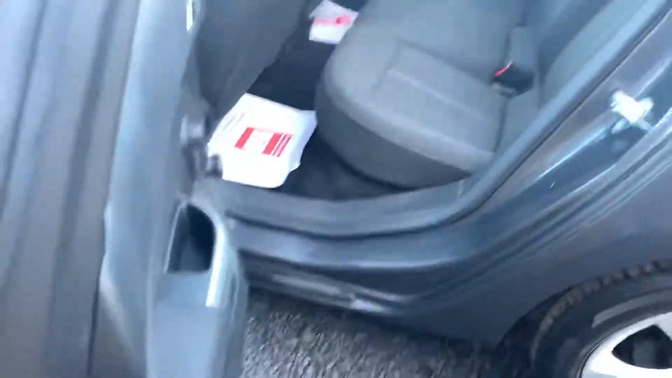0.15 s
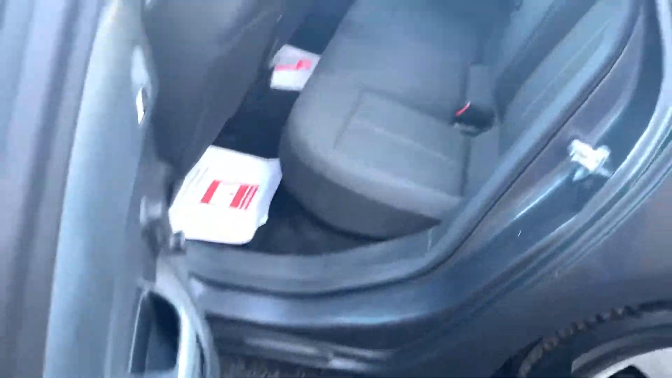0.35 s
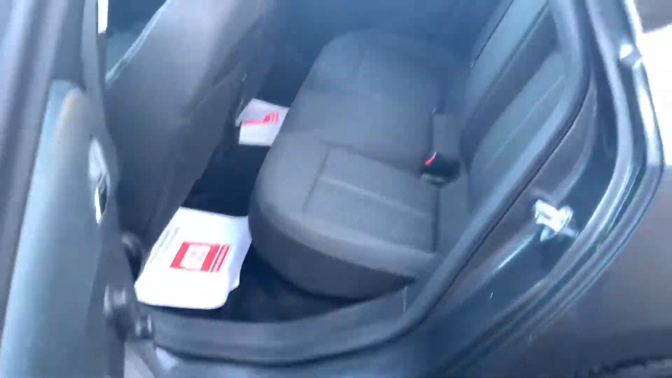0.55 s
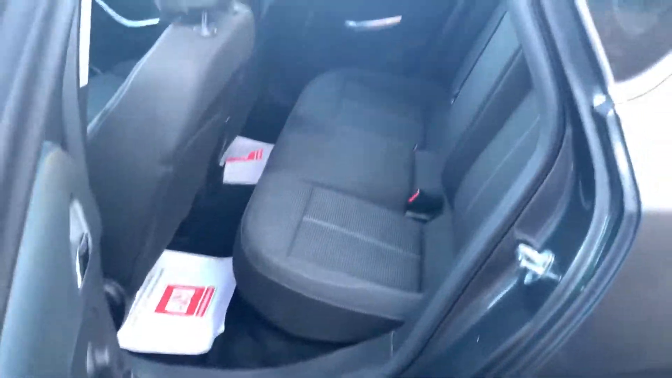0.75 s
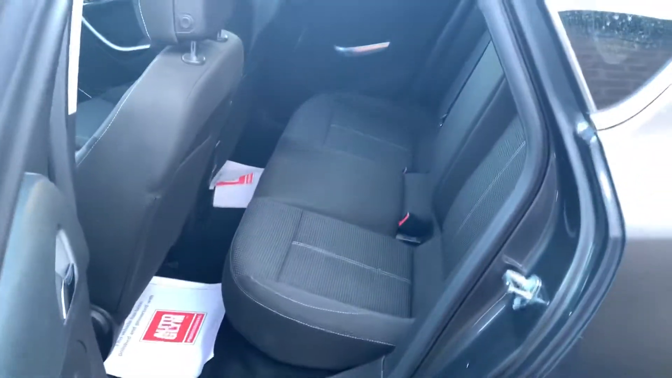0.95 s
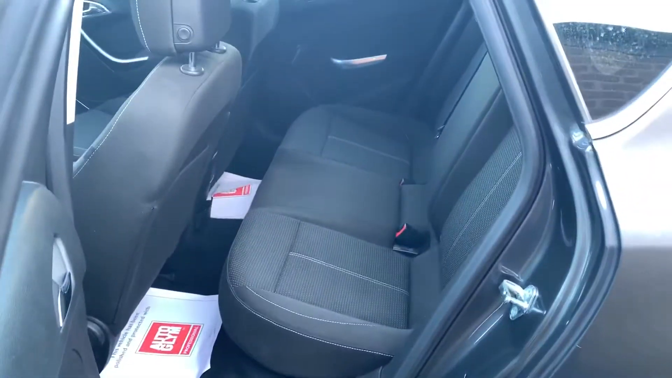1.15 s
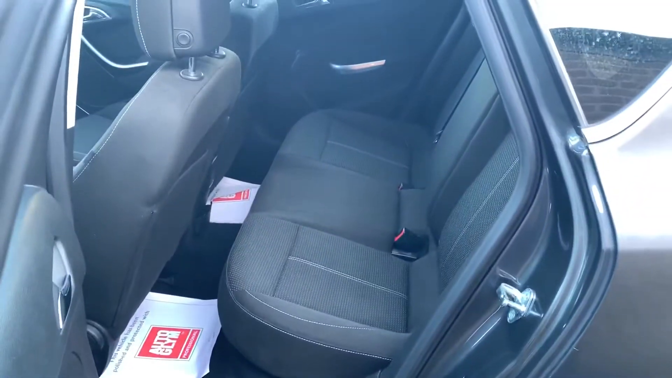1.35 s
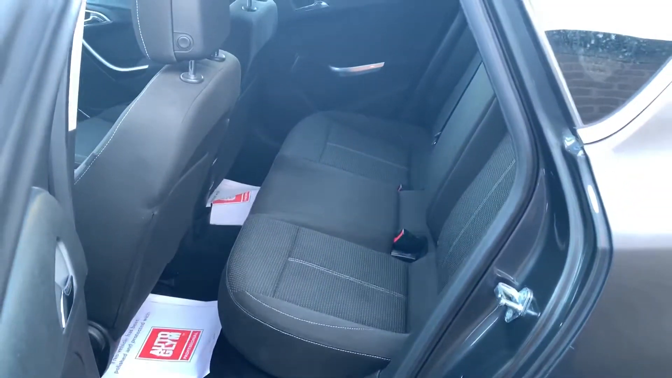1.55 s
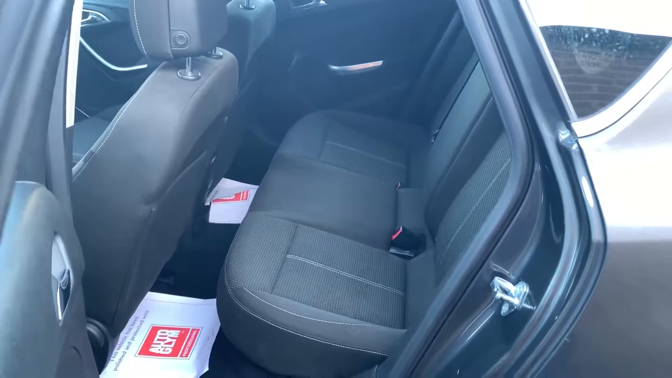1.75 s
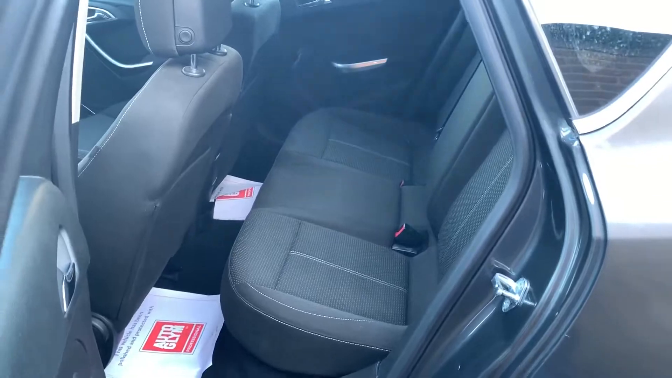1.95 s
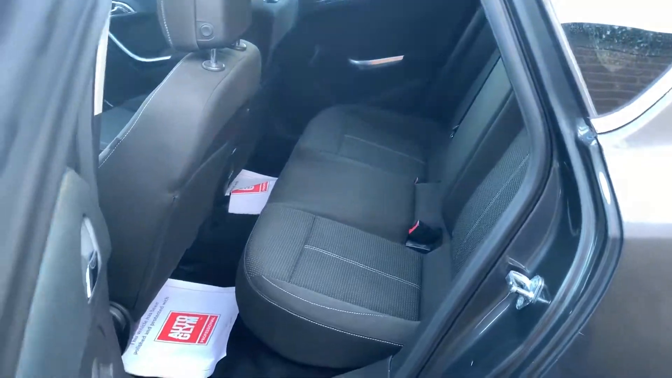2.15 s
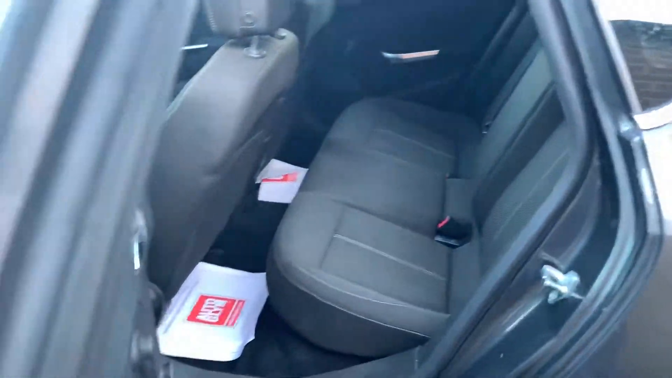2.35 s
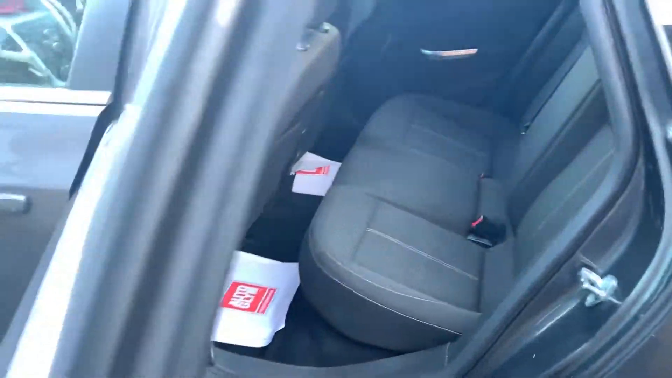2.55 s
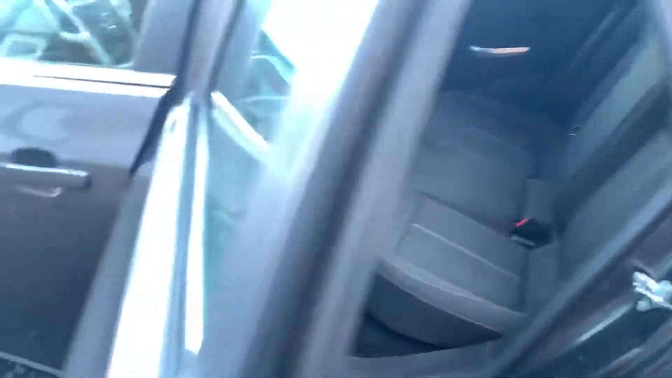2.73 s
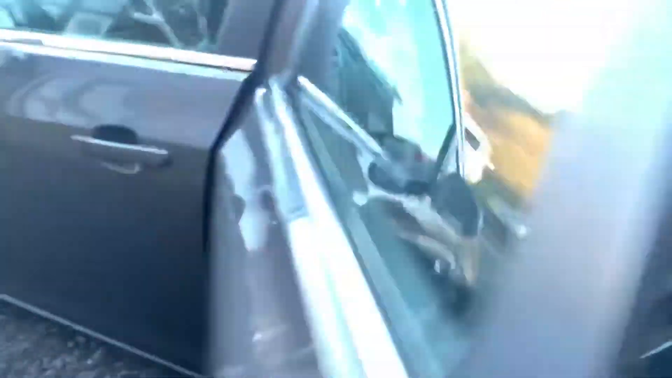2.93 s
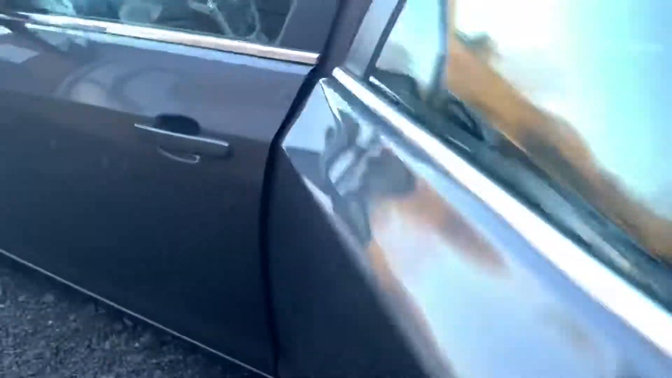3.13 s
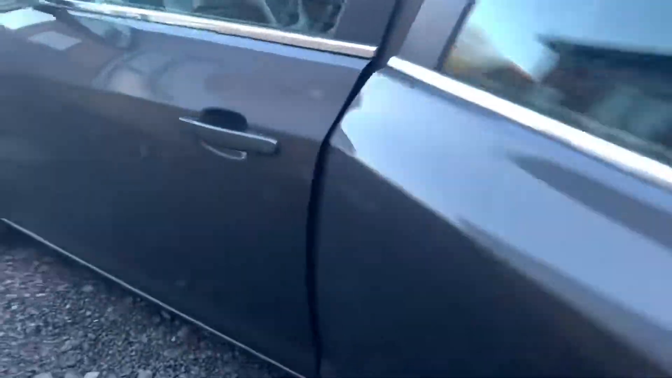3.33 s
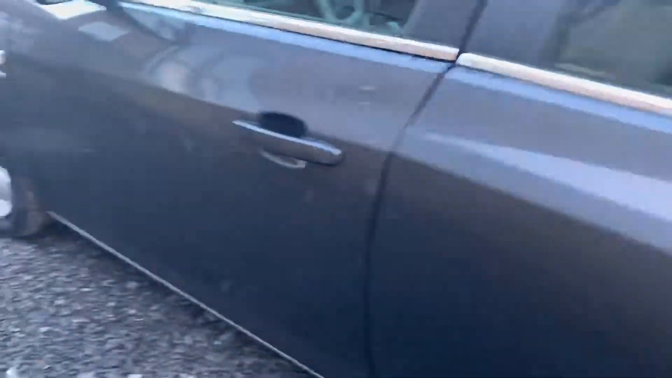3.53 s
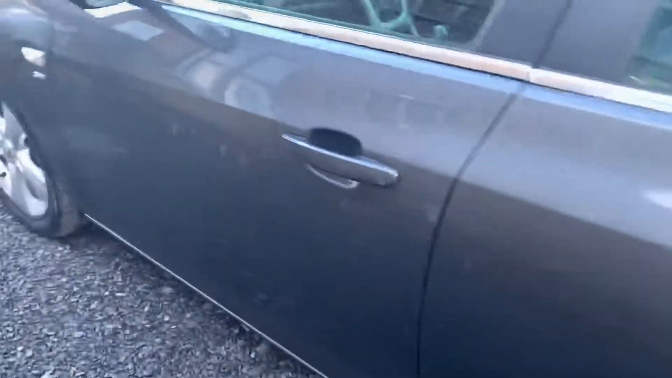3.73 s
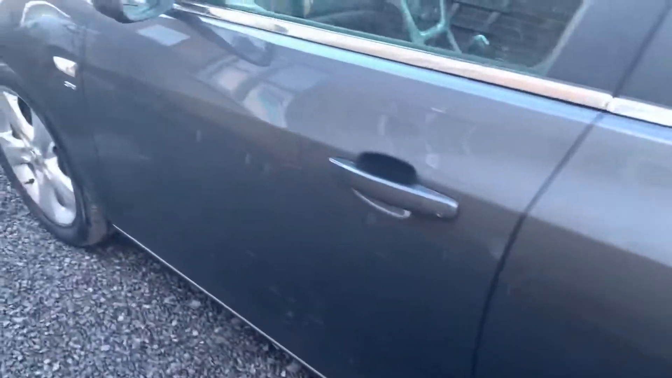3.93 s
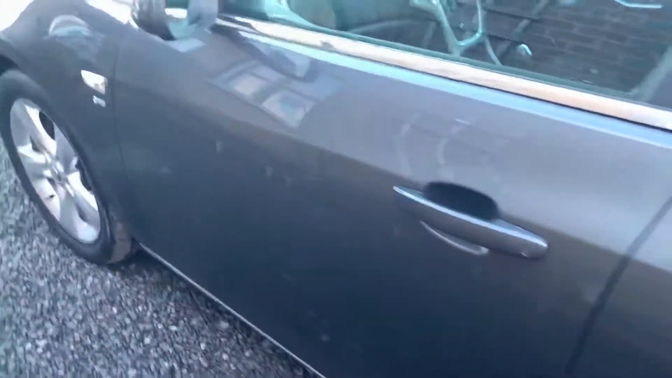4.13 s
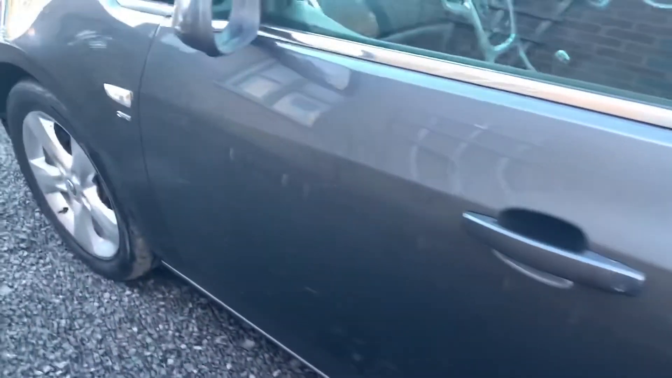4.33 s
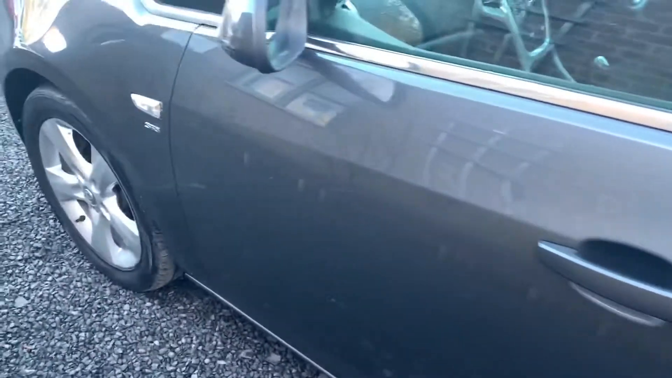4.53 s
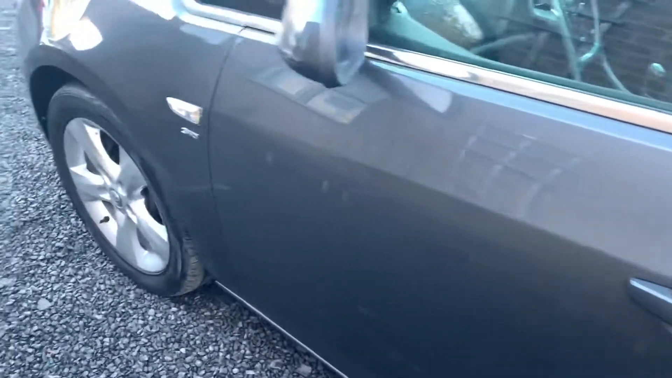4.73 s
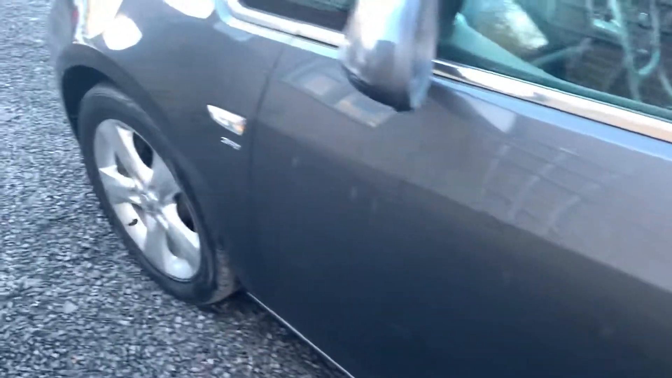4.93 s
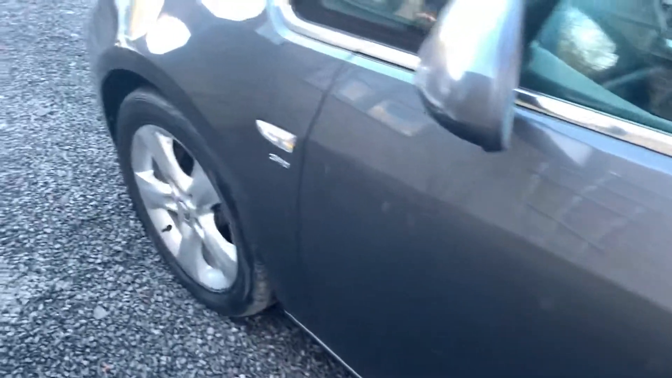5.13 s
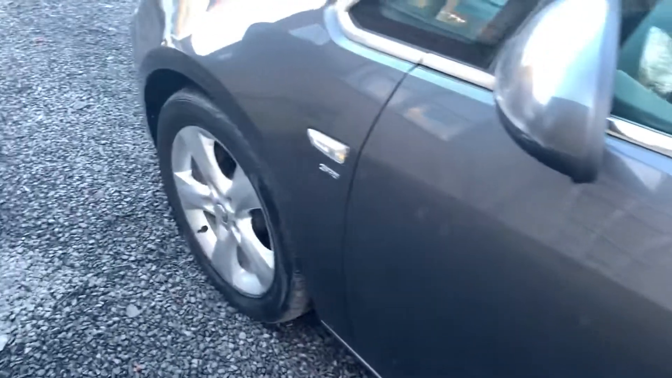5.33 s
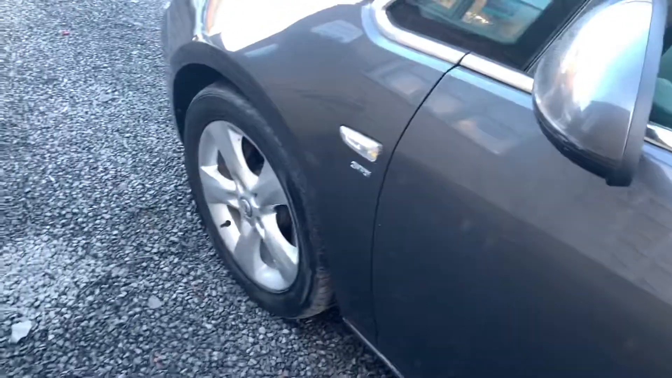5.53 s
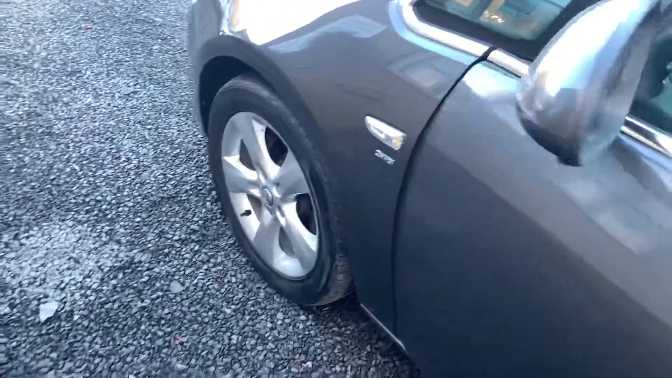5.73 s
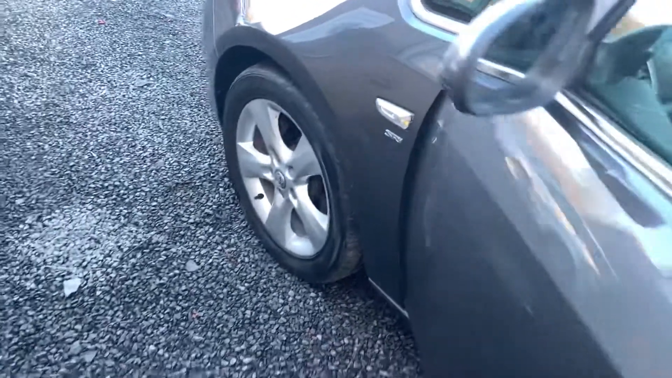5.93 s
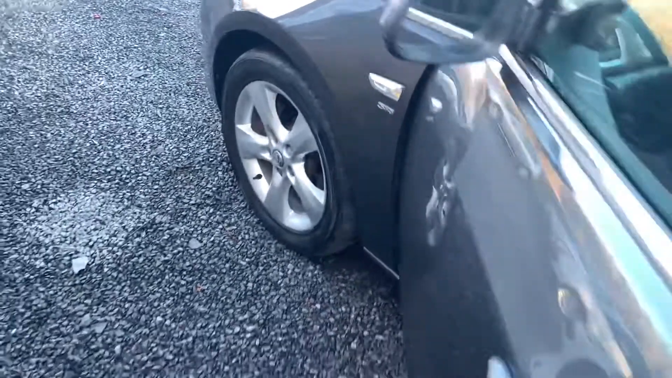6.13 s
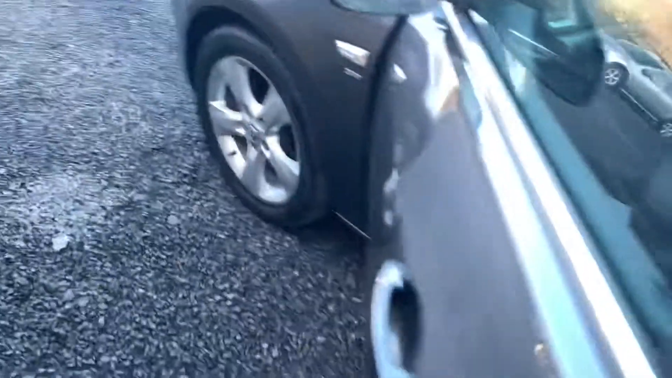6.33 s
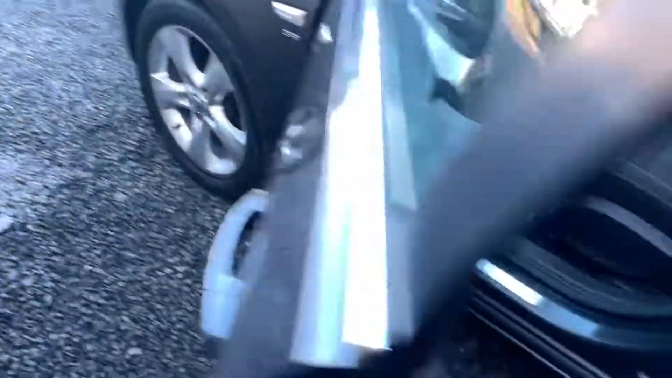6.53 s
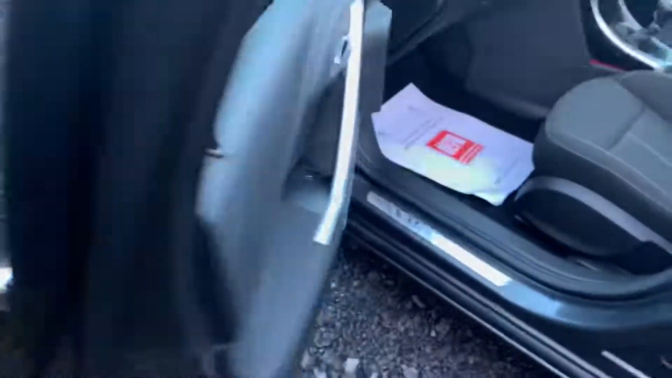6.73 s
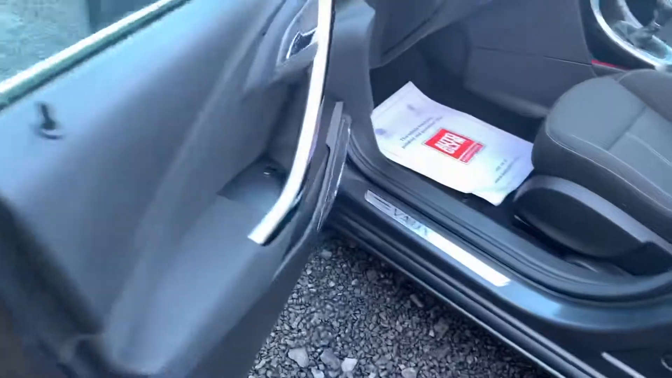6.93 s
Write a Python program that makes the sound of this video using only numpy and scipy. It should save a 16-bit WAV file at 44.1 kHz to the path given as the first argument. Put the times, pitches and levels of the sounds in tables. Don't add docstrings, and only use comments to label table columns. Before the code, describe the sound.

Close stereo microphones in an open gravel yard. A few stone knocks and grit crunches, then a quiet gap with small birds chirping over faint road rumble. Steps resume, a car's rear door swings with a rush of air and slams with a deep thunk. More gravel scuffing follows, then a handle click, latch release and a heavy clunk as the front door opens, with crunching to the end.

```python
import sys
import numpy as np
from scipy import signal
from scipy.fft import rfft, irfft, next_fast_len
from scipy.io import wavfile
from scipy.ndimage import uniform_filter1d, map_coordinates

SR = 44100
rng = np.random.default_rng(int(sys.argv[2]) if len(sys.argv) > 2 else 0)


def dump(signal):
    limited = np.clip(np.atleast_2d(signal).T, -1, 1)
    pcm = np.round(limited * 32767).astype(np.int16)
    wavfile.write(sys.argv[1], SR, pcm)


def linear_from_db(decibels):
    return 10 ** (np.asarray(decibels, float) / 20)


N = 311916


def unit(x):
    return x / np.sqrt(np.mean(x ** 2) + 1e-20)


def along(points, hz):
    f, v = np.transpose(points)
    return np.interp(np.log(hz + 1), np.log(f + 1), v)


def wobble(rate):
    knots = rng.standard_normal(int(N * rate / SR) + 4)
    return map_coordinates(knots, [np.arange(N) * rate / SR])


def filtered(x, response):
    m = next_fast_len(N + 8192)
    return irfft(rfft(x, m) * response(np.fft.rfftfreq(m, 1 / SR)), m)[..., :N]


def spread(pair, spectrum):
    # frequency in Hz, left-right likeness 0-1.
    alike = [(60, 0.99), (130, 0.67), (290, 0.76), (640, 0.28), (1400, 0.58), (3000, 0.67), (7000, 0)]

    def response(hz):
        turn = np.arccos(np.clip(along(alike, hz), -1, 1)) / 2
        return linear_from_db(along(spectrum, hz)) * [np.cos(turn), np.sin(turn)]

    mid, side = filtered(pair, response)
    return unit(np.array([mid + side, mid - side]))


def grains(density, scatter_db):
    chance, sign, size = rng.random((3, 2, N))
    return (chance < density / SR) * np.sign(sign - .5) * linear_from_db(-scatter_db * np.log(size + 0.006))


def add(out, s, sound):
    part = out[:, round(s * SR):round(s * SR) + sound.shape[1]]
    part += sound[:, :part.shape[1]]


def pan(db):
    return linear_from_db([[db / 2], [-db / 2]])


def swells(rows, extra_db=0, sooner=1):
    s, rise, fall, db = np.transpose(rows)[:4, :, None]
    knots = np.arange(0, N, 64)
    t = knots / SR - s
    gain = linear_from_db(db + extra_db - 20 * sooner * np.where(t < 0, -t / rise, t / fall))
    return np.interp(np.arange(N), knots, np.sqrt(np.sum(gain ** 2, axis=0)))


def crunch_of_stones():
    # air pocket pitch in Hz, width in Hz.
    hollows = [(880, 1100), (1150, 310), (1420, 2600)]
    # frequency in Hz, crunch level in dB per Hz.
    crunch_colour = [(180, -37), (300, -16.5), (467, -10.5), (658, -11.5), (998, -10), (2300, -11.5),
                     (3000, -19.5), (5720, -120)]
    ringing = 0
    for hz, width in hollows:
        pocket = lambda f: .3 + 1 / (1 + 2j * (f - hz) / width)
        ringing = ringing + filtered(grains(700, scatter_db=2.3), pocket)
    return spread(ringing, crunch_colour)


def scuff_swells():
    # start in seconds, peak in dB.
    scuffs = [(.005, -41), (0.232, -47), (0.435, -56), (1.762, -62), (1.782, -73), (2.578, -46),
              (2.775, -33), (2.93, -47), (3.332, -59), (3.355, -37.5), (3.375, -30), (4.073, -42),
              (4.083, -36), (4.093, -37), (4.216, -29), (4.252, -30), (4.268, -30.5), (4.279, -26),
              (4.314, -24), (4.323, -27), (4.509, -40), (4.755, -24), (4.773, -26), (4.923, -48),
              (5.083, -38), (5.157, -45), (5.725, -35), (6.061, -34), (6.466, -34), (6.503, -42),
              (6.512, -31), (6.52, -25.5), (6.556, -26), (6.961, -38)]
    out, t = np.zeros((2, N)), np.arange(SR // 8) / SR
    shape = np.clip(t / 0.0024, 0, 1) * np.exp(-(t / 0.028) ** 2)
    for s, db in scuffs:
        add(out, s, linear_from_db(db - 14) * shape[None])
    return out


def gravel():
    # time of most pressure in seconds, press and lift in seconds per 20 dB,
    # crunch in dB, grit over crunch in dB.
    treads = [(0.342, 0.25, 0.019, -63.5, 4), (0.521, 0.45, 0.36, -63, 0), (2.3, 0.048, .2, -87, -13),
              (2.57, 0.04, 0.07, -78, 7), (2.78, 0.13, 0.25, -58.5, -2.5), (2.95, 0.56, 0.11, -56.5, 3.5),
              (3.361, 0.032, 0.25, -52, -3), (3.59, 0.37, 0.23, -57.5, 1), (3.936, 0.11, 0.0073, -67, 6.5),
              (4.081, 0.009, 0.36, -52, 3.5), (4.332, 0.44, 0.045, -63, 3), (4.62, 1, 0.42, -66, -0.5),
              (4.759, 0.014, 1, -62, 7), (4.916, 0.11, 0.32, -64.5, 4.5), (5.09, 0.3, 0.32, -90, -1),
              (5.735, 0.047, 0.33, -59, 5.5), (5.82, 0.23, 0.84, -57, -3), (6.005, 0.046, 0.16, -52, 1),
              (6.2, 0.29, 0.062, -63, -2), (6.571, 0.084, 0.03, -52, 3), (6.5, 0.33, 1, -63.5, 4.5),
              (6.75, 0.32, 1, -65, 7), (7.0, 0.16, 0.057, -65, 7)]
    # frequency in Hz, grit level in dB per Hz.
    grit_colour = [(1060, -54), (3000, -1.5), (4200, -2), (5700, -9.5), (7300, -4.5), (10600, -7.5),
                   (14600, -19.5), (15900, -18.5)]
    grit_over_db = np.transpose(treads)[4][:, None]
    press = linear_from_db(-85) + swells(treads)
    rub = linear_from_db(-100) + swells(treads, grit_over_db, sooner=0.99)
    clumps = wobble(45)
    crunch = unit(linear_from_db(2 * clumps) * crunch_of_stones())
    clumps_db = 3.1 * clumps + 1.38 * wobble(90)
    grit = unit(linear_from_db(clumps_db) * spread(grains(9000, scatter_db=3.5), grit_colour))
    bright = np.diff(grit, n=2, prepend=[[0, 0]] * 2)
    scuffing = scuff_swells() * unit(bright + .5 * grit)
    return press * linear_from_db(9.0) * crunch + rub * linear_from_db(6.5) * grit + scuffing


def drag():
    # time of most drag in seconds, gather and settle in seconds per 20 dB, level in dB.
    drags = [
        (2.86, 0.096, 0.59, -53),
        (4.15, 0.052, 0.4, -46),
        (4.78, 0.039, 0.57, -52),
        (4.94, 0.2, 0.062, -42.5),
        (6.98, 0.061, 0.12, -44),
    ]
    # frequency in Hz, level of the hollow in dB per Hz.
    hollow_colour = [(600, -15), (950, 7), (1300, 5.5), (1900, -56)]
    return swells(drags) * spread(grains(1600, scatter_db=2.5), hollow_colour)


def knocked_stone(hz, grit_db):
    t = np.arange(1000) / SR
    lag = rng.normal(0, .00004) * np.array([[1], [-1]])
    turns = np.clip(hz * (t - .0002 + lag), 0, None)
    falling = 2 * np.pi * (turns - .35 * np.exp(-turns / .5))
    ring = turns / .9 * np.exp(1 - turns / .9) * np.sin(falling)
    bed = 0.29 * turns * np.exp(1 - turns) * np.sin(1.25 * np.pi * turns)
    knock = ring + bed
    delays, sizes = rng.uniform(0.00282, 0.02, (2, 7)), rng.normal(0, 0.38, (2, 7))
    scatter = np.zeros((2, len(t)))
    np.add.at(scatter, ([[0], [1]], (delays * SR).astype(int)), sizes * linear_from_db(-1300 * delays))
    knock = knock + signal.fftconvolve(knock, scatter, axes=1)[:, :len(t)]
    dust = rng.standard_normal((2, len(t) + 3))
    spit = (dust[:, 3:] - dust[:, :-3]) * linear_from_db(grit_db - 9 - 60 * abs(t - .001) / .015)
    return knock + spit


def stones():
    # start in seconds, peak in dB, pitch in Hz, grit in dB.
    single_stones = [(0.336, -38.5, 1500, 7), (0.337, -28, 1220, -31.5), (0.34, -37, 656, -18),
                     (0.646, -13, 1097, -23), (0.648, -28.5, 536, -26), (2.731, -36.5, 1160, -9),
                     (2.777, -32, 1020, -13), (2.862, -34, 1090, 1), (3.415, -27, 1070, -27),
                     (4.289, -17.5, 927, -5.5), (4.415, -32.5, 1160, -2), (4.447, -29, 1170, -5.5),
                     (4.595, -19, 1210, -19.5), (4.78, -28, 967, -4), (4.918, -31, 1170, -19),
                     (4.937, -25.5, 1170, -27), (5.062, -33, 1120, -23), (5.09, -30, 1220, -20),
                     (5.452, -37, 1930, -7), (5.502, -39.5, 1080, 7.5), (5.834, -25.5, 945, -19),
                     (5.992, -27.5, 900, -39.5), (6.038, -19.5, 1150, -34.5), (6.069, -22.5, 990, -2),
                     (6.57, -30.5, 940, 2), (6.979, -27.5, 1080, -6)]
    # start in seconds, peak in dB.
    pebbles = [(0.191, -44.5), (0.417, -45), (.421, -43.5), (.529, -41), (.546, -59), (0.661, -46),
               (2.56, -47), (2.744, -38), (2.842, -44), (2.874, -38.5), (2.949, -35), (3.07, -43),
               (3.049, -43), (2.437, -42.5), (2.503, -43.5), (2.685, -41), (2.983, -39), (3.364, -40),
               (4.217, -31), (4.502, -36.5), (4.62, -42), (4.841, -33), (4.955, -34), (5.015, -37.5),
               (5.16, -59), (5.961, -54), (6.149, -44), (6.254, -58), (6.378, -38.5), (6.432, -39),
               (6.445, -42), (6.936, -40), (6.961, -46), (7.02, -40), (7.031, -44), (6.62, -43),
               (0.273, -40), (0.29, -40), (0.601, -54), (4.083, -46), (4.115, -54), (4.169, -36.5),
              (4.188, -36), (4.326, -38), (4.36, -50), (4.514, -44.5), (4.569, -51), (4.657, -39.5),
              (4.709, -41), (4.744, -44), (4.76, -35), (4.801, -36), (4.825, -48), (4.871, -43),
              (4.902, -49), (4.931, -42), (6.208, -44), (6.478, -38)]
    small = [(s, db, 1160 * np.exp(rng.normal(0, 0.2)), -1.5) for s, db in pebbles]
    out = np.zeros((2, N))
    for s, db, hz, grit_db in single_stones + small:
        side = pan(rng.normal(-0.023, 2.5))
        add(out, s, linear_from_db(db - 1.5) * side * knocked_stone(hz, grit_db))
    return out


def ticks():
    # start in seconds, peak in dB, pitch in Hz.
    dry_ticks = [(0.0177, -50, 5600), (0.169, -35, 6140), (.8046, -58, 4900), (.888, -59, 5200),
                 (.9158, -57, 6500), (.9364, -62, 5400), (1.0496, -54, 5200), (1.1797, -54, 7300),
                 (1.1924, -61, 6000), (1.2037, -63, 5000), (1.4554, -65, 6300), (1.7214, -60, 8000),
                 (2.324, -49, 4030), (2.411, -54, 11100), (2.5594, -43, 6500), (2.575, -46, 9000),
                 (2.585, -44, 9000), (2.594, -42, 9000), (2.603, -39, 8000), (2.632, -43, 9000),
                 (2.647, -36, 9500), (2.6677, -36, 9500), (2.622, -40, 9000), (2.686, -37, 9000),
                 (2.707, -39, 9500), (3.041, -42, 9500), (3.047, -50, 9500), (4.0382, -43, 10000),
                 (4.36, -35, 10000), (4.4, -34, 10000), (4.513, -43, 10500), (3.7455, -36, 9800),
                 (3.9294, -32, 6660), (3.9296, -27, 11600), (4.954, -36, 4070), (5.7137, -35, 9980),
                 (6.3375, -37.5, 3130), (6.23, -38, 8550), (6.38, -30.5, 7950), (6.853, -32, 10500)]
    out, t = np.zeros((2, N)), np.arange(99) / SR - .001
    for s, db, hz in dry_ticks:
        tick = np.cos(2 * np.pi * hz * t) * np.exp(-(t * hz / .8) ** 2)
        add(out, s, linear_from_db(db) * pan(rng.normal(0, 1.8)) * tick)
    return out


def loose_parts(t, lag):
    # frequency in Hz, level in dB per Hz.
    rattle_colour = [(88, -55), (150, -4), (340, -7.5), (611, -15.5), (1190, -8), (1860, -18),
                     (3900, -20.5), (15900, -36.5)]
    # frequency in Hz, time to fall 60 dB in seconds.
    rattle_t60 = [(150, 0.42), (1000, 0.14), (3000, 0.083), (12000, 0.069)]
    f, when, z = signal.stft(rng.standard_normal((2, len(t))), SR, nperseg=128)
    shape_db = along(rattle_colour, f)[:, None] - 60 * when / along(rattle_t60, f)[:, None]
    rattle = signal.istft(z * linear_from_db(shape_db), SR, nperseg=128)[1][:, :len(t)]
    rattle[0] = 0.4 * np.roll(rattle[1], round(lag * SR)) + 0.44 * rattle[0]
    early_rms = np.sqrt(np.mean(rattle[:, :400] ** 2))
    return rattle * (1 - np.exp(-t / .002)) / early_rms


def door(blows, modes, rise, lag):
    out, t = np.zeros((2, N)), np.arange(SR // 5 * 2) / SR
    hz, level, t60 = np.transpose(modes)[:, :, None]
    step = -2 * np.pi * hz * lag + np.clip(hz / 900, 0, 2) * rng.normal(0, 0.39, hz.shape)
    ports = np.exp(.5j * step * [1, -1])
    walk = np.cumsum(rng.normal(0, 0.59, (len(hz), 42)), axis=1) * np.maximum(1, hz / 453)
    drift = np.array([np.interp(t * 100, np.arange(42), w - w[0]) for w in walk])
    envelope = linear_from_db(-60 * t / t60) * (1 - np.exp(-t * hz / rise))
    swing = envelope * np.exp(1j * (2 * np.pi * hz * t + drift))
    for s, db, tilt_db, rattle_db in blows:
        size = linear_from_db(level + tilt_db * np.log2(hz / 300) + rng.normal(0, 1.65, hz.shape))
        size = size * np.where(hz < 150, 1, rng.choice([-1, 1], hz.shape))
        ring = ((size * ports).T @ swing).imag
        add(out, s, linear_from_db(db - 6.0) * (ring + linear_from_db(rattle_db) * loose_parts(t, lag)))
    return out


def rear_door():
    # start in seconds, level in dB, tilt in dB per octave, rattle in dB.
    slam = [(3.596, -33, 1, 3), (3.603, -21, -4, -11), (3.607, -17.5, 7, -1), (3.614, -13, 5, 7),
            (3.62, -16.5, 6, 6), (3.626, -12.5, -6.5, -14), (3.633, -14.5, -5, -4), (3.642, -18.5, -0.5, 0),
            (3.648, -21, -6, -8), (3.663, -18, 0.5, -11), (3.68, -31.5, 2.5, 0.5), (3.70, -28.5, -1, -6.5),
            (3.735, -33, -6, -5), (3.79, -42, -1.5, -6)]
    # panel mode in Hz, level in dB, time to fall 60 dB in seconds.
    rear_modes = [(54.7, -9.5, 0.55), (72.3, -3, 0.56), (100.6, 3, 0.19), (138.6, -8, 0.54),
                  (175.4, -4.5, 0.53), (247.6, -2.5, 0.42), (288.2, -1, 0.39), (319.5, 5.5, 0.1),
                  (460, -15, 0.044), (534, 1.5, 0.06), (718, -4.5, 0.12), (845, -4, 0.086),
                  (985, -3.5, 0.17), (1170, -10, 0.14)]
    return pan(-1.3) * door(slam, rear_modes, rise=0.16, lag=0.00027)


def front_door():
    # start in seconds, level in dB, tilt in dB per octave, rattle in dB.
    handle = [
        (5.284, -33.5, -4, 0.5),
        (5.292, -22, 5, -8.5),
        (5.303, -25.5, -9, -23),
        (5.32, -38, -6, -23),
        (5.341, -30.5, -5, -12),
    ]
    latch = [
        (5.366, -34, 3, 6.5),
        (5.372, -28, 4.5, -4),
        (5.384, -28.5, 6.5, -24),
        (5.389, -21, -1.5, -15),
        (5.408, -42, 8.5, -15),
        (5.43, -35.5, 3, -27),
        (5.45, -36.5, -6, -2),
    ]
    check = [
        (3.322, -35, -5, -7.5),
        (5.73, -42.5, -3, 8),
        (5.85, -25, 0.5, -10),
        (5.858, -22.5, 2.5, 2.5),
        (5.863, -18.5, -8, -12),
        (5.882, -18, 5, -1),
        (5.891, -8, -6, -40),
        (5.905, -20.5, -23, -25),
        (5.96, -30.5, -16.5, -6.5),
        (6.01, -34, -3, -7),
    ]
    # frequency in Hz, level in dB, time to fall 60 dB in seconds.
    grip_modes = [(161, 0, 0.19), (224, 2.5, 0.18), (295, 6, 0.017), (364, 3.5, 0.092), (472, -5, 0.091),
                  (2080, -20.5, 0.047), (1080, -1.5, 0.014), (1453, -16, .05)]
    pawl_modes = [(55.7, -5, 0.36), (117, 2.5, 0.19), (176, 6, 0.12), (226, -3, 0.38), (297, 0, 0.22),
                  (371, 0.5, 0.096), (534, 4, 0.034), (719, -11.5, 0.11), (975, -3, 0.055)]
    strap_modes = [(182, 4, 0.09), (234.6, 4, 0.11), (305, -9.5, 0.28), (392, 6, 0.058), (491, -7.5, 0.093),
                   (731.5, -10.5, 0.11), (1004, -11, 0.11), (1262, -10, 0.095), (1500, 7.5, 0.0092)]
    pull = door(handle, grip_modes, rise=0.66, lag=0.000283)
    release = door(latch, pawl_modes, rise=0.16, lag=0.00028)
    return pull + release + door(check, strap_modes, rise=1.0, lag=.0001)


def whistle(length, from_hz, to_hz):
    n = round(length * SR)
    unsteady_hz = 45 * uniform_filter1d(rng.standard_normal(n), size=200) * 14
    hz = np.linspace(from_hz, to_hz, n) + unsteady_hz
    flutter_db = 3 * unit(uniform_filter1d(rng.standard_normal(n), size=300))
    tone = np.sqrt(2) * np.sin(2 * np.pi * np.cumsum(hz) / SR)[None]
    return tone * np.sqrt(np.hanning(n)) * linear_from_db(flutter_db + 3.0)


def birds():
    # start in seconds, length in seconds, from Hz, to Hz, level in dB.
    bird_notes = [(0.742, 0.052, 4900, 4590, -69), (0.826, 0.07, 4400, 4150, -69),
                  (0.926, 0.037, 4390, 4370, -65), (1.06, 0.013, 2510, 3420, -71),
                  (1.069, 0.033, 3380, 4200, -68), (1.093, 0.022, 4250, 4450, -69),
                  (1.258, 0.026, 5500, 4200, -85), (1.264, 0.04, 6950, 5460, -90),
                  (1.25, 0.02, 2940, 2200, -81), (1.23, 0.03, 4400, 4180, -87),
                  (1.286, 0.028, 4080, 4200, -66.5), (1.608, 0.061, 3910, 3680, -69),
                  (1.151, .06, 2120, 2110, -83), (1.108, 0.036, 3240, 3230, -61),
                  (1.143, 0.042, 4340, 4200, -68.5), (1.197, 0.049, 2910, 3260, -67.5),
                  (1.235, 0.026, 3220, 2900, -67), (1.257, 0.0607, 4300, 3850, -68),
                  (1.336, 0.12, 4020, 3830, -70), (1.411, 0.1, 3920, 3990, -74),
                  (1.591, 0.036, 3250, 2860, -65.5), (2.064, 0.087, 3180, 3710, -70.5),
                  (2.167, 0.095, 5550, 4870, -81)]
    # pitch in Hz, level in dB, note length in seconds, list of starts in seconds.
    callers = [
        (4130, -68, 0.071, [1.54, 1.838, 1.911, 2.168]),
        (4220, -64, .075, [6.29, 6.63, 6.93]),
        (4200, -71, 0.1, [2.469, 2.78, 3.099, 3.4, 3.779, 3.9, 4.66, 4.979]),
        (6300, -89.5, 0.05, [1.085, 1.36, 1.43, 1.5, 1.67, 1.82, 2.02, 2.3]),
    ]
    out = np.zeros((2, N))
    for s, length, from_hz, to_hz, db in bird_notes:
        add(out, s, linear_from_db(db) * pan(rng.normal(0, 6.3)) * whistle(length, from_hz, to_hz))
    for hz, db, length, starts in callers:
        for s in starts:
            level = linear_from_db(db + rng.normal(0, 0.2))
            add(out, s, level * pan(-3.6) * whistle(length, hz + 30, hz - 30))
    t = np.arange(SR // 2) / SR
    tail = rng.standard_normal((2, len(t))) * linear_from_db(-60 * t / 0.79)
    tail = tail / np.linalg.norm(tail[0])
    return out + linear_from_db(-5) * signal.fftconvolve(out, tail, axes=1)[:, :N]


def air():
    # time of most speed in seconds, gather and settle in seconds per 20 dB, rush in dB.
    swings = [
        (0.0, .1, 0.036, -41),
        (3.05, 6.2, 3.4, -53.5),
        (3.19, 0.22, 0.38, -38),
        (3.58, 0.76, 0.38, -34),
        (4.14, 0.17, 7.8, -65),
        (5.8, 0.7, 0.32, -67),
        (6.1, 1.1, 0.014, -38.5),
        (6.4, 1.1, 4, -67),
    ]
    # frequency in Hz, level of far road and air in dB per Hz.
    road_colour = [(25, -25), (52, 4), (150, -14), (420, -17), (1150, -41), (4400, -44), (4750, -53),
                   (15900, -72)]
    # frequency in Hz, level of the rush in dB per Hz.
    rush_colour = [(53, -53), (90, -16.5), (162, -10), (401, -6.5), (643, -21.5), (883, -13), (1500, -48),
                   (3300, -120)]
    swing = swells(swings)
    z = signal.stft(rng.standard_normal((2, N)), nperseg=256)[2]
    field = uniform_filter1d(rng.standard_normal(z.shape[1:]), size=4, axis=0)
    field = uniform_filter1d(field, size=40, axis=1)
    patchy = signal.istft(z * linear_from_db(1.8 * unit(field)), nperseg=256)[1][:, :N]
    rumble = np.hypot(linear_from_db(-50.5), linear_from_db(-9.5) * swing)
    road = rumble * linear_from_db(.6 * wobble(5.6)) * spread(patchy, road_colour)
    flutter_db = 2 * wobble(14)
    rush = spread(rng.standard_normal((2, N)), rush_colour)
    return road + (linear_from_db(-102) + swing) * linear_from_db(flutter_db - 11.0) * rush


def scene():
    feet = gravel() + drag() + stones() + ticks()
    return feet + rear_door() + front_door() + birds() + air()


def roll_off(x):
    return signal.sosfilt(signal.butter(12, 16750, fs=SR, output="sos"), x)


def record(dry):
    # frequency in Hz, share 0-1 of the treble that passes one port, then the other.
    shared = [(2000, 0), (3200, .55), (6000, .75), (7500, .97), (16000, .975)]
    # frequency in Hz, left-right level in dB.
    bass_lean = [(60, -3.5), (400, -0.5), (1200, 0)]
    share = lambda hz: np.clip(along(shared, hz), 0, 1)
    lead = lambda hz: np.exp(2j * np.pi * (hz * 8.5 / SR - .15))
    early = filtered(dry[0], lambda hz: share(hz) * lead(hz))
    own = filtered(dry[1], lambda hz: np.sqrt(1 - share(hz) ** 2))
    ports = np.array([dry[0], early + own])
    leaned = filtered(ports, lambda hz: pan(along(bass_lean, hz))[:, 0])
    rounded = leaned / (1 + abs(leaned / .88) ** 6) ** (1 / 6)
    band = lambda hz: (hz < 15950) / np.sqrt(1 + (30 / (hz + 1)) ** 8)
    return roll_off(filtered(rounded, band))


dry = scene()
out = record(dry)
dump(out)
```